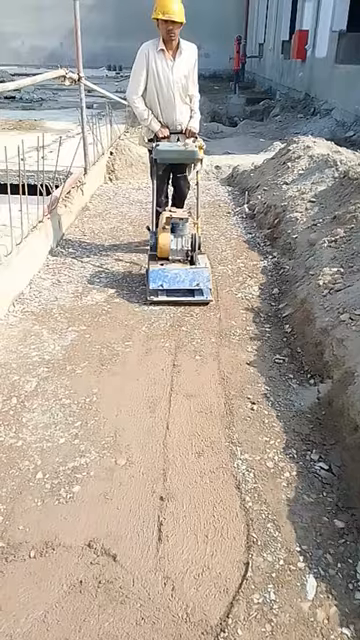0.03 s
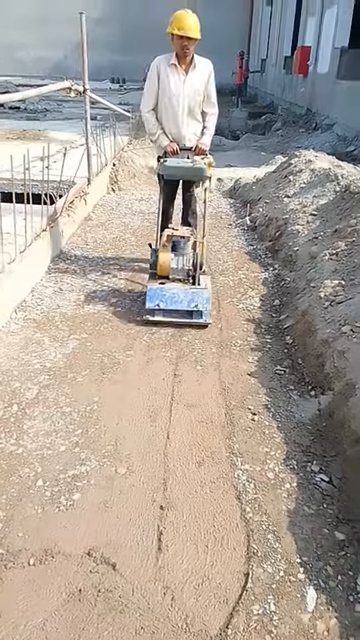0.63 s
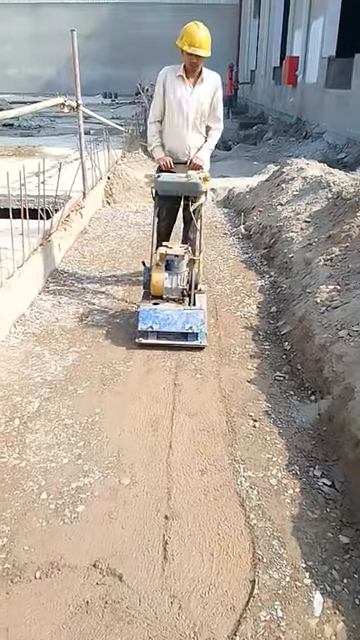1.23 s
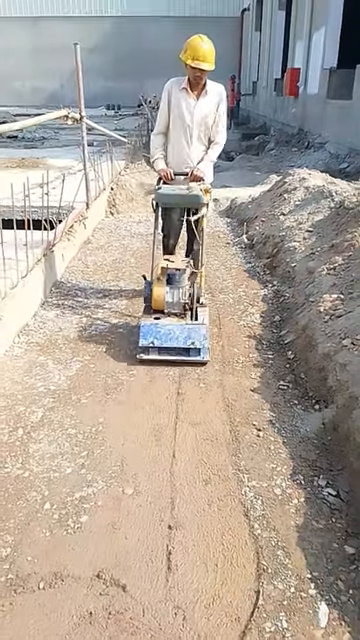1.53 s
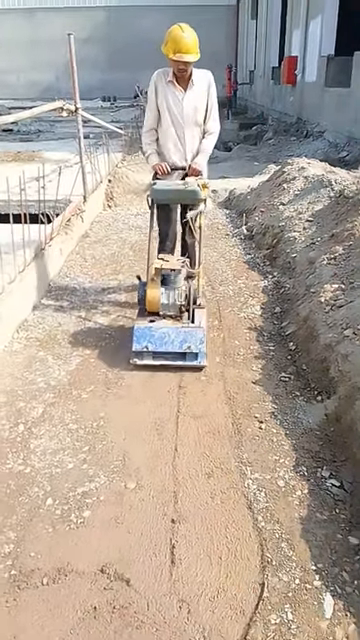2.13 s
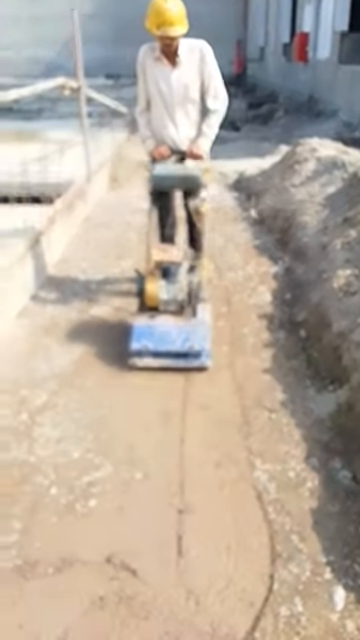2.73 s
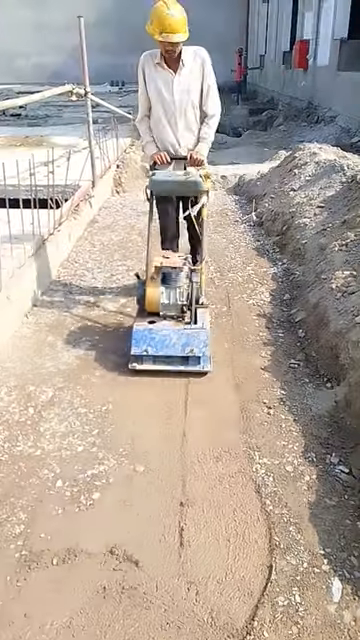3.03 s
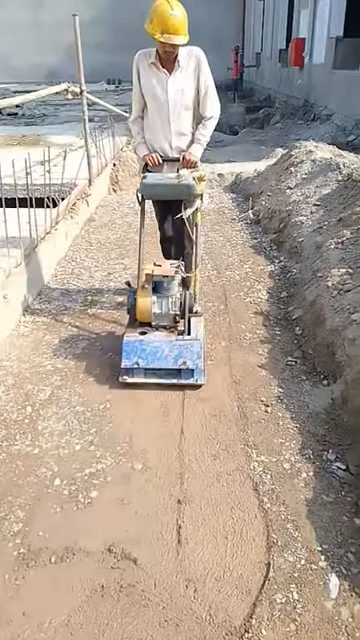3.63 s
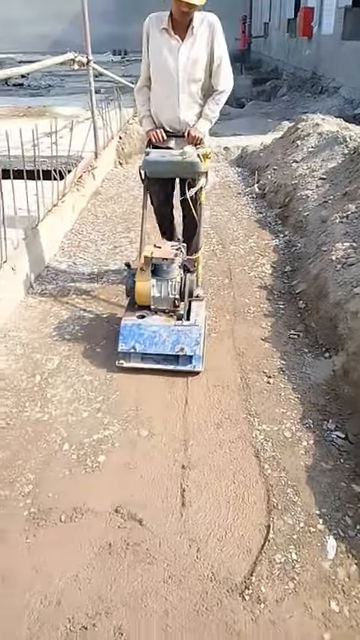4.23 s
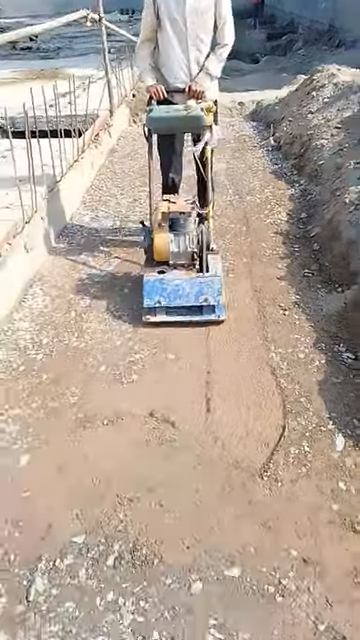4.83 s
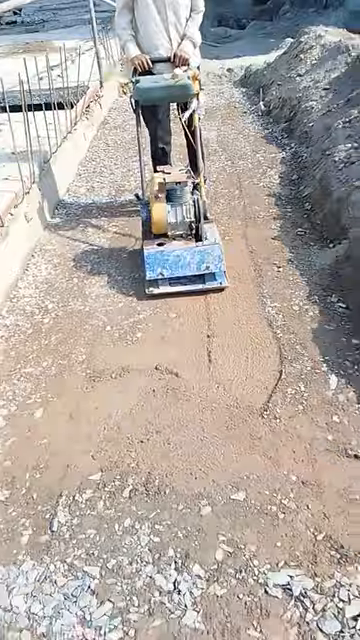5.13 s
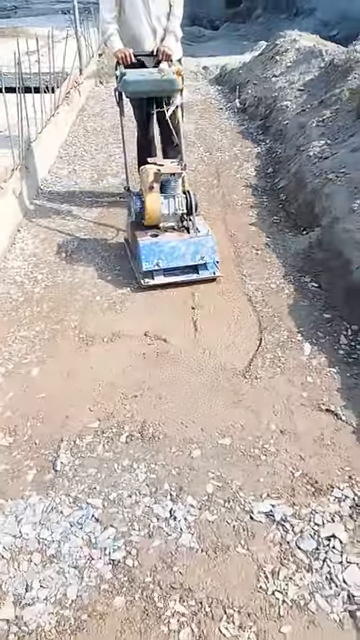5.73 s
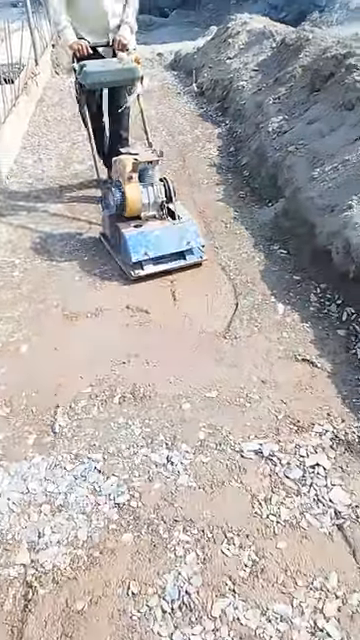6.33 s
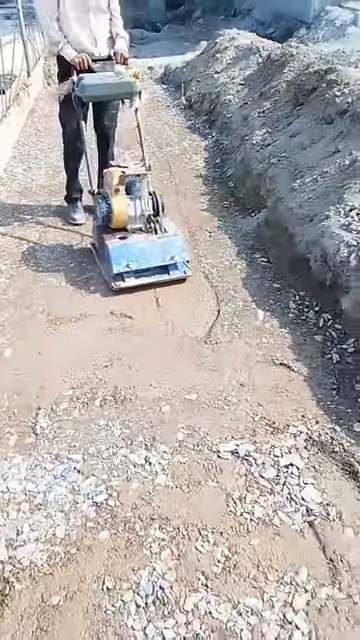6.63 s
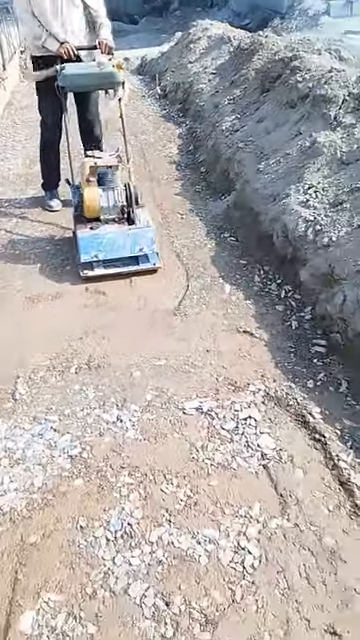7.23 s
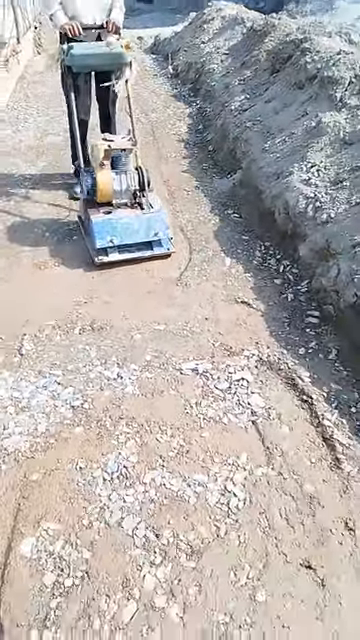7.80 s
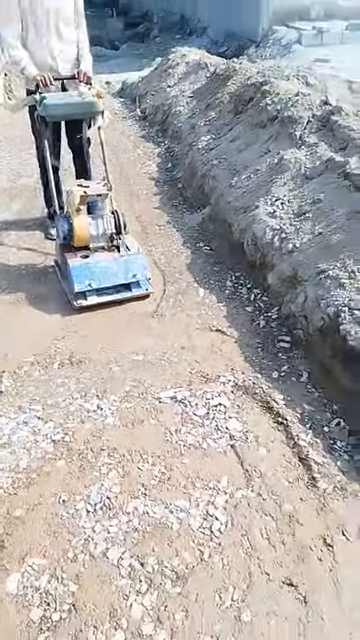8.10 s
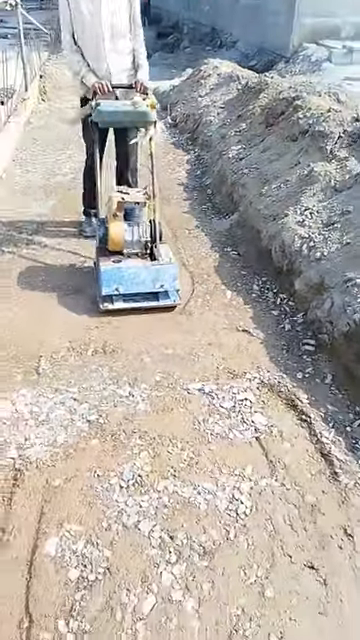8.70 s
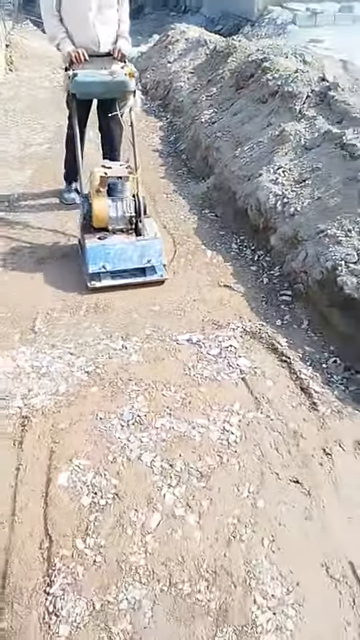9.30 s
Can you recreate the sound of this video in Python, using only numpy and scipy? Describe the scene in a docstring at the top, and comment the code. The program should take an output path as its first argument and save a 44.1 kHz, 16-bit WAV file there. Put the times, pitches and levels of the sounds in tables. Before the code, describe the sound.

A petrol plate compactor runs steadily over soil and gravel, with a loud metallic rattle and a droning engine.

```python
"""A petrol plate compactor in the open air, crawling over soil and gravel towards the microphone and turning.
Its eccentric shaft slaps the plate on the ground 70 times a second; a worn bearing knocks and sings
under the swinging load. Bands of the rattle shift and swell as the machine nears and turns.
Close up, one bearing tone briefly howls. The one-cylinder engine putters below; stones thump
under the plate, grit hisses and loose steel parts ring."""
import sys
import numpy as np
from scipy import signal
from scipy.fft import rfft, irfft, next_fast_len
from scipy.io import wavfile
from scipy.ndimage import uniform_filter1d, minimum_filter1d, map_coordinates

SR = 44100
rng = np.random.default_rng(int(sys.argv[2]) if len(sys.argv) > 2 else 0)


def master_out(mix):
    """Clip the mix to full scale and print it as 16-bit PCM to the path in sys.argv[1]."""
    frames = np.transpose(np.atleast_2d(mix))
    ceiling = np.clip(frames, -1, 1)
    pcm = np.round(ceiling * 32767).astype(np.int16)
    wavfile.write(sys.argv[1], SR, pcm)


N = 417186
KNOCKS_PER_TURN, FIRINGS_PER_TURN = 3.775, .3639  # bearing and engine, per turn of the shaft

# The eccentric shaft. Each row: time in seconds, speed in turns per second.
SHAFT_SPEED = [(0, 70.25), (.45, 69.96), (.75, 70.23), (1.4, 69.97), (1.95, 70.28), (2.42, 69.94),
               (2.92, 70.7), (3.5, 69.93), (4.2, 70.36), (4.65, 69.93), (5.05, 70.3), (5.7, 69.34),
               (6.3, 70.18), (6.9, 70.45), (7.35, 69.91), (7.7, 70.46), (8.3, 69.84), (8.8, 69.72),
               (9.35, 68.9)]
# The machine's path, seen from the microphone. Each row: time in seconds,
# nearness from 0 far to about 1 close, swing of its heading from about -1 to 1.
MACHINE_PATH = [(.1, 0.004, 0.023), (2.2, 0.18, -0.44), (4.0, 0.59, -1.39), (4.6, 0.59, -0.43),
                (5.1, 0.33, -0.12), (5.7, 0.76, 0.99), (6.2, 0.95, 0.37), (6.6, 1.09, -0.97),
                (7.95, 0.98, -0.86), (8.2, 1.17, 0.036), (8.6, 1.01, 1.2), (9.4, 1, 0.082)]
# The leading bearing tones. Each row: multiple of the knock rate, sideband in shaft orders,
# level in dB, gain in dB per unit of nearness, gain in dB per unit of swing.
LEAD_TONES = [(1, 2, -34.5, 5.5, -1.5), (2, 3, -26, -7.5, 2), (4, 3, -47, 15.5, -3.5)]
# The weaker bearing tones. Each row: multiple of the knock rate, sideband in shaft orders, level in dB.
WEAK_TONES = [(1, 1, -45), (1, 3, -37), (1, 4, -41), (1, 6, -32.5), (1, 7, -36.5), (1, 8, -40), (2, 2, -36),
              (2, 4, -28), (2, 5, -41), (2, 6, -42.5), (2, 7, -48), (3, 7, -41), (3, 2, -35.5),
              (3, 3, -32.5), (3, 4, -29.5), (3, 5, -41.5), (3, 6, -36), (4, 4, -38), (4, 5, -31.5),
              (4, 6, -36), (4, 7, -43), (5, 4, -39), (5, 6, -36.5), (5, 7, -49.5)]
# The shaft's hum. Each row: shaft order, level in dB.
SHAFT_HUM = [(1, -76), (2, -54.5), (3, -47), (4, -44), (5, -39.5), (6, -38.5), (7, -49)]
# The broad sound of the steel body. Each row: frequency in Hz, relative level in dB.
BODY_SPECTRUM = [(150, -44), (230, 0), (430, -2), (520, -24), (1000, -3.5), (1550, -0.5), (2000, -1.5),
                 (3000, 4), (3450, 2.5), (3800, 1), (4100, -10.5), (4500, -18), (5200, -23), (6200, -33),
                 (8000, -50)]
# Bands of the rattle that shift and swell as the machine nears and turns. Each row: centre and width in
# Hz, level in dB, shifts in Hz per unit of nearness and of swing, gains in dB per unit of the same two.
MOVING_BANDS = [(758, 237, -31.5, -88, 31, 6, 0.5), (901, 230, -22.5, 123, 82, -7, -3.5),
                (1223, 270, -30, 129, 67, 5, -1), (1920, 420, -27.5, 265, 3, -15, -10),
                (2227, 370, -28.5, 133, 74, 3.5, 1.5), (2700, 174, -26.5, 221, 17, -14.5, -7)]
# A loose panel clatters. Each row: middle and half length in seconds, pitch in Hz, level in dB.
PANEL_CLATTERS = [(4.502, 0.47, 2240, -22.5), (4.55, 1.05, 3100, -29.5), (5.747, 0.5, 1520, -26.5),
                  (4.4, .45, 870, -32), (4.6, 0.43, 1300, -27), (6.296, 0.28, 810, -23.5),
                  (6.5, 0.14, 1400, -23), (6.705, 0.32, 1270, -25), (7.705, 0.29, 1295, -23),
                  (8.996, 0.15, 1530, -26), (8.15, 0.18, 2580, -25.5), (8.537, 0.41, 774, -24),
                  (9.15, 0.41, 2660, -30.5), (9.228, 0.21, 830, -22.5), (.8, 0.89, 1230, -34),
                  (1.1, 0.55, 790, -29.5), (3.3, 1, 830, -28), (2.45, 0.23, 875, -28),
                  (2.9, 0.32, 1440, -37), (4.55, .25, 3290, -32), (5.398, 0.37, 860, -30.5),
                  (6.15, 0.41, 1050, -31), (7.5, 0.64, 1590, -33.5), (8.25, 0.35, 1970, -33)]
# Hard landings of the plate and clanks of the belt guard. Each row: start in seconds, level in dB.
PLATE_LANDINGS = [(.402, -10), (.66, -12), (.857, -13), (1.285, -13), (1.497, -12), (2.276, -13),
                  (2.326, -14), (2.368, -12), (2.44, -13), (2.515, -14), (2.572, -13.5), (2.639, -14),
                  (2.695, -12), (2.766, -14), (2.977, -14), (3.335, -11), (4.245, -13), (4.347, -13),
                  (4.548, -13), (4.674, -14), (4.747, -14), (4.932, -13), (5.186, -13), (5.259, -15),
                  (5.416, -13), (5.546, -14), (6.006, -14), (6.206, -12), (6.264, -14), (6.55, -12),
                  (7.045, -12), (7.189, -14), (7.573, -15), (8.258, -11), (8.571, -10), (9.002, -13),
                  (9.189, -13), (9.245, -13), (9.304, -13)]
BELT_GUARD_CLANKS = [(.228, -17), (.53, -20), (.742, -21), (.797, -19), (.853, -19.5), (1.229, -20),
                     (1.646, -20), (1.722, -21), (2.219, -21), (2.279, -18), (2.331, -20), (2.421, -20),
                     (2.817, -20), (2.929, -18), (3.073, -21), (3.36, -21), (3.814, -21), (4.175, -19),
                     (4.236, -22)]
# The modes these blows ring. Each row: frequency in Hz, relative level in dB.
PLATE_RING = [(770, -2), (850, -4), (950, -4.5), (1090, -2.5), (1280, -2), (1450, -5.5), (2250, -18),
              (3100, -10)]
BELT_GUARD_RING = [(2690, -3), (2780, 5), (2870, -7)]
# The colours of muffler, pounded soil and grit. Each row: frequency in Hz, relative level in dB.
MUFFLER_SPECTRUM = [(60, -52), (100, -24.5), (128, -15.5), (153, -27), (178, -20.5), (205, -4.5), (250, 3),
                    (305, -1), (380, -2.5), (530, -9.5), (575, -7), (700, -5), (950, -10.5), (2500, -31),
                    (6000, -64)]
SOIL_SPECTRUM = [(25, -55), (50, -45), (100, -14.5), (140, -22.5), (165, -31), (190, -18), (230, -1.5),
                 (350, 2), (450, -5.5), (600, -7), (1200, -31), (3000, -83)]
GRIT_SPECTRUM = [(3500, -11), (5000, -13), (6300, 1), (7800, 6), (9000, 4.5), (12000, 2), (14000, 3),
                 (15700, 6.5)]
# Stones under the plate. Each row: start in seconds, relative peak level in dB.
STONE_THUMPS = [(0.569, -14.5), (1.233, -16), (1.354, -19), (1.989, -11.5), (2.04, -21), (2.095, -18.5),
                (2.408, -15.5), (2.731, -12.5), (4.63, -17), (6.452, -14), (6.525, -18), (6.816, -12.5),
                (7.199, -14.5), (7.295, -9.5), (7.688, -11.5), (8.008, -15)]
# The pulley rings louder. Each row: middle and half length in seconds, level in dB.
PULLEY_SPELLS = [(1.68, 0.5, -33.5), (1.788, 0.038, -34), (2.37, 0.035, -33), (5.447, 0.16, -33.5),
                 (7.86, 0.066, -30.5), (9.4, 0.3, -31.5)]
# The belt guard rings on. Each row: middle and half length in seconds, pitch in Hz, level in dB.
BELT_GUARD_SPELLS = [(.5, 0.91, 2676, -32.5), (.7, 1, 2767, -29.5), (1.8, 0.28, 2760, -32),
                     (2.6, 0.76, 2775, -29.5), (3.1, 1, 2280, -30.5)]
# Loose bolts and brackets. Each row: pitch in Hz, usual level in dB.
LOOSE_PARTS = [(6934, -66), (7531, -71), (7973, -73), (10153, -69), (10794, -68.5), (11784, -67.5),
               (12279, -69), (13491, -68), (14530, -64), (15649, -54.5)]
# One part jingles out. Each row: middle and half length in seconds, pitch in Hz, level in dB.
JINGLE_SPELLS = [(1.5, .7, 7531, -53), (1.8, .8, 11784, -55), (3.3, .3, 14530, -50), (3.6, .5, 7531, -55),
                 (3.9, .5, 10794, -57), (4.4, .45, 6934, -56), (5.05, .15, 7531, -55),
                 (4.94, .06, 15649, -47), (5.26, .08, 15649, -46), (5.28, .06, 6934, -52),
                 (5.5, .15, 7531, -53), (5.7, .13, 6934, -52), (6.25, .07, 14530, -54),
                 (4.7, .25, 7531, -56), (5.6, .25, 7800, -58), (5.7, .2, 6550, -59), (6.4, .4, 7531, -63),
                 (7.1, .25, 14530, -50), (8.45, .12, 14530, -55), (7.55, .18, 10794, -58),
                 (7.7, .25, 14530, -54), (7.95, .18, 6934, -60), (8.3, .12, 10794, -58),
                 (9.3, .13, 6934, -53)]
# Bands that sink at the microphone. Each row: middle and half length in seconds,
# centre and width in Hz, gain in dB.
BAND_DIPS = [(.3, 1.2, 2150, 71, -5), (0.502, 0.33, 2970, 100, -5), (4.5, 3, 570, 25, -6),
             (8.903, 0.85, 612, 34.8, -11.5), (8.9, .5, 1780, 110, -7), (.1, .35, 500, 130, -6.5),
             (1.9, .7, 1540, 80, -4), (3.9, 0.63, 2150, 35, -10), (5.9, 0.43, 660, 30, -6),
             (7.15, 0.83, 1420, 50, -8.5), (7.3, .7, 2920, 100, -2), (8.75, .35, 2130, 60, -8),
             (9.45, .25, 580, 70, -15)]


def rattle(turns):
    """Rollers knock and the plate slaps under the load, about once a turn; steel scrapes throughout."""
    rollers = pulses(KNOCKS_PER_TURN * turns, jitter_s=.000097, scatter_db=5.5)
    ring = steel_clang(rollers * shaft_load(turns, depth_db=32))
    slap = rng.standard_normal(N) * shaft_load(turns, depth_db=28)
    lowpass = signal.butter(1, 1900, fs=SR, output="sos")
    knocks = unit(signal.sosfilt(lowpass, ring + .7 * slap) * amp(1.5 * wobble(45)))
    knocks = 4.5 * np.tanh(knocks / 4.5)  # the contacts give way, evening out the hardest blows
    scrape = unit(rng.standard_normal(N) * shaft_load(turns, depth_db=-4) * amp(1.02 * wobble(150)))
    bright_scrape = scrape - .52 * signal.sosfilt(lowpass, scrape)
    blows = amp(-10.5) * knocks + amp(-.9) * bright_scrape
    hz, t, spectra = signal.stft(blows * amp(.5 * wobble(25)), SR, nperseg=1024)
    return signal.istft(spectra * np.sqrt(rattle_power(hz, t)), SR, nperseg=1024)[1][:N]


def shaft_load(turns, depth_db):
    """The force of the eccentric weight peaks once a turn."""
    return unit(amp(depth_db * np.cos(2 * np.pi * turns) / 2))


def steel_clang(blows, t60=.012):
    """Every blow is followed by the short dense ring of welded steel."""
    t = np.arange(SR // 10) / SR
    tail = rng.standard_normal(len(t)) * amp(-60 * t / t60)
    return unit(blows + signal.fftconvolve(blows, tail / np.linalg.norm(tail))[:N])


def bearing_drone(turns):
    """The bearing's knock rate, swung by the load, sings in sidebands; the shaft hums beneath."""
    slip = .03 * wobble(14) + .007 * wobble(60)  # rollers creep in their cage
    mean_speed = turns[-1] * SR / N
    # neighbouring tones take the same path through the steel, so they crest together
    lags = .62 * rng.random(size=64)

    def tone(multiple, sideband):
        lag = lags[round(multiple * round(KNOCKS_PER_TURN) + sideband)]
        cycles = (multiple * KNOCKS_PER_TURN + sideband) * turns + multiple * slip + lag
        return np.sqrt(2) * np.sin(2 * np.pi * cycles)

    out = np.zeros(N)
    for multiple, sideband, db, near_db, swing_db in LEAD_TONES:
        level = amp(from_microphone(db, near_db, swing_db) + 1.8 * wobble(14) + 1.2 * wobble(3))
        if multiple == 2:  # this tone flutters, and howls near the end
            flutter = unit(amp(4 * np.tanh(wobble(45))))
            level = np.hypot(level * flutter, plate_howl())
        out += level * tone(multiple, sideband)
    closer_db = from_microphone(-4.5, per_nearness=2, per_swing=0)
    for multiple, sideband, db in WEAK_TONES:
        gain = band_gain((multiple * KNOCKS_PER_TURN + sideband) * mean_speed)
        out += amp(db + closer_db + 3.4 * wobble(9)) * gain * tone(multiple, sideband)
    for order, db in SHAFT_HUM:
        out += amp(db + .86 * wobble(3.8)) * np.sin(2 * np.pi * (order * turns + rng.random()))
    return out


def bearing_tone(turns, cycles_per_turn=8.55165):
    """A steady bearing tone near 600 Hz, heard over the engine's puffs."""
    return amp(-38 + wobble(2.7)) * np.sqrt(2) * np.sin(2 * np.pi * cycles_per_turn * turns)


def plate_howl(start_s=8.1, attack_s=.075, hold_s=.47, fade_db_per_s=22):
    """Envelope of a howl close to the microphone: the plate suddenly takes up one bearing tone."""
    age = np.maximum(np.arange(N) / SR - start_s, 0)
    fade_db = fade_db_per_s * np.maximum(age - hold_s, 0)
    return np.minimum(age / attack_s, 1) * amp(-20 - fade_db + 1.6 * wobble(22))


def hammering(turns, slap_db=1.1, chatter_db=.45, judder_db=.75):
    """Gain of the steel: it surges about once a turn, and more when a roller meets the peak load."""
    beat = KNOCKS_PER_TURN % 1  # the rollers beat against the nearest shaft orders below and above
    wave = lambda per_turn: np.cos(2 * np.pi * per_turn * turns)
    return unit(amp(slap_db * wave(.97) + chatter_db * wave(1 - beat) + judder_db * wave(beat)))


def rattle_power(hz, t):
    """Power of the body, the moving bands and the clatters at the microphone, by frequency and time."""
    share = lambda shape: shape / shape.mean(axis=0)
    peak = lambda centre_hz, width_hz: share((1 + ((hz[:, None] - centre_hz) / width_hz) ** 2) ** -4.)
    power = share(spectrum_gain(BODY_SPECTRUM, hz)[:, None] ** 2) * amp(-24.5) ** 2
    for rest_hz, width_hz, db, near_hz, swing_hz, near_db, swing_db in MOVING_BANDS:
        level = amp(from_microphone(db, near_db, swing_db, t))
        centre_hz = from_microphone(rest_hz, near_hz, swing_hz, t)
        power = power + peak(centre_hz, width_hz) * level ** 2
    for middle_s, half_s, centre_hz, db in PANEL_CLATTERS:
        level = amp(db) * swell(middle_s, half_s, t)
        power = power + peak(centre_hz, width_hz=105) * level ** 2
    return power


def band_gain(tone_hz):
    """A tone swells as a band of the rattle moves onto it."""
    hz, t = np.linspace(0, SR / 2, 1024), np.linspace(0, N / SR, 200)
    power = rattle_power(hz, t)[np.searchsorted(hz, tone_hz)]
    return unit(curves(np.c_[t, np.sqrt(power)])[0])


def strikes(blows, modes, t60, attack_s=.0009):
    """Struck steel: each blow rings the same modes, in a slightly different mix."""
    t = np.arange(SR // 10) / SR
    envelope = amp(-60 * t / t60) * (1 - np.exp(-t / attack_s))
    hz, mode_db = np.transpose(modes)
    out = np.zeros(N + len(t))
    for start_s, db in blows:
        sizes = amp(db + mode_db + rng.normal(0, 2.3, len(hz)))
        waves = np.sin(2 * np.pi * (hz[:, None] * t + rng.random((len(hz), 1))))
        out[round(start_s * SR):][:len(t)] += sizes @ waves * envelope
    return out[:N]


def engine(turns):
    """Belted to the shaft, the engine puffs through its muffler at each firing."""
    puffs = pulses(FIRINGS_PER_TURN * turns, jitter_s=.00009, scatter_db=1.3)
    return amp(-31.7) * coloured(muffler_chambers(puffs), MUFFLER_SPECTRUM)


def muffler_chambers(puffs):
    """Echoes in the muffler's chambers spread every puff in the same way."""
    def allpass(hz):
        echoes = [np.exp(-2j * np.pi * hz * delay_s) for delay_s in (.0023, .0041, .0067)]
        return np.prod([(echo - .5) / (1 - .5 * echo) for echo in echoes], axis=0)
    return filtered(puffs, allpass)


def soil_pounding(turns, steady_db=-35.5, rise_s=.02):
    """The plate pounds the ground and bucks on stones."""
    bucking = np.zeros(N)
    for start_s, db in STONE_THUMPS:
        age = np.maximum(np.arange(N) / SR - start_s, 0) / rise_s
        bucking += amp(db - 9) * age * np.exp(1 - age)
    pounding = coloured(rng.standard_normal(N) * shaft_load(turns, depth_db=6.5), SOIL_SPECTRUM)
    return np.hypot(amp(steady_db), bucking) * pounding


def grit_bursts(per_second=150, decay_s=.007):
    """Envelope of grit being crushed: small bursts that start sharply and die away."""
    crushes = (rng.random(N) < per_second / SR) * amp(3.3 * np.clip(rng.standard_normal(N), -2, 2))
    return unit(signal.lfilter([1], [1, -np.exp(-1 / (decay_s * SR))], crushes))


def grit_hiss(bursts, level_db, even_share):
    """Grit grinds under the plate, single bursts over an even hiss."""
    grains = rng.standard_normal(N) * (even_share + bursts) * amp(.25 * wobble(390) + .67 * wobble(24))
    return amp(level_db) * coloured(grains, GRIT_SPECTRUM)


def pulley_ring():
    """The shaken pulley holds one clear note that swells now and then."""
    swells = sum(amp(db) * swell(middle_s, half_s) for middle_s, half_s, db in PULLEY_SPELLS)
    return (amp(-35.5) + swells) * steel_mode(hz=3429, t60=.09, shaking=amp(1.5 * wobble(70)))


def guard_ring():
    """The loose belt guard rings in fits while the machine is still some way off."""
    out = np.zeros(N)
    for middle_s, half_s, hz, db in BELT_GUARD_SPELLS:
        fits = amp(4 * np.tanh(wobble(40)))
        out += amp(db) * swell(middle_s, half_s) * steel_mode(hz, t60=.071, shaking=fits)
    return out


def bolt_jingle(bursts, grit_db):
    """Bolts and brackets jingle faintly with each crush of grit, harder where the grit is loud."""
    out = np.zeros(N)
    shaken_db = .5 * (grit_db - grit_db.mean())
    for hz, db in LOOSE_PARTS:
        # each part works loose, chatters for a moment and settles again
        chatter = (1 + bursts) * amp(3 * wobble(22) + 6.5 * np.tanh(1.5 * wobble(7) - .6))
        out += amp(db + shaken_db) * steel_mode(hz, t60=.07, shaking=chatter)
    for middle_s, half_s, hz, db in JINGLE_SPELLS:
        chatter = (1 + bursts) * amp(3 * wobble(16))
        out += amp(db) * swell(middle_s, half_s) * steel_mode(hz, t60=.074, shaking=chatter)
    return out


def steel_mode(hz, t60, shaking, skirt_hz=500):
    """A steel mode shaken by noise with the given envelope; a second, wide pole keeps its skirts dark."""
    decay_rates = np.array([np.log(1000) / t60, 2 * np.pi * skirt_hz])
    poles = np.exp((2j * np.pi * hz - decay_rates) / SR)
    return unit(signal.lfilter([1], np.poly(poles), rng.standard_normal(N) * shaking).real)


def band_dips(x):
    """At the microphone, narrow bands sink for a while as the machine moves."""
    hz, t, spectra = signal.stft(x, SR, nperseg=2048)
    dip_db = sum(db * np.exp(-((hz[:, None] - centre_hz) / width_hz) ** 2) * swell(middle_s, half_s, t)
                 for middle_s, half_s, centre_hz, width_hz, db in BAND_DIPS)
    return signal.istft(spectra * amp(dip_db), SR, nperseg=2048)[1][:N]


def from_microphone(base, per_nearness, per_swing, times=None):
    """A quantity that follows how close the machine is and which side it turns to the microphone."""
    nearness, swing = curves(MACHINE_PATH, times)
    return base + per_nearness * nearness + per_swing * swing


def pulses(cycles, jitter_s, scatter_db):
    """One impulse for each whole cycle, uneven in time and size."""
    onsets = np.flatnonzero(np.diff(np.floor(cycles)))
    timing, size = rng.standard_normal((len(onsets), 2)).T
    when = np.clip(np.round(onsets + jitter_s * SR * timing), 0, N - 1).astype(int)
    return np.bincount(when, amp(scatter_db * size), N)


def swell(middle_s, half_s, times=None):
    """A smooth rise and fall, per sample or at the given times."""
    t = np.arange(N) / SR if times is None else times
    return np.exp(-((t - middle_s) / half_s) ** 2)


def curves(rows, times=None):
    """Each column after the time, per sample or at the given times."""
    knots_s, *columns = np.transpose(rows)
    t = np.arange(N) / SR if times is None else times
    return [np.interp(t, knots_s, column) for column in columns]


def wobble(rate):
    """A smooth random curve, rate knots a second."""
    knots = rng.standard_normal(int(N * rate / SR) + 4)
    grid = np.linspace(0, N, N // 16)
    return np.interp(np.arange(N), grid, map_coordinates(knots, [grid * rate / SR]))


def coloured(x, spectrum):
    """x through a spectrum, at rms 1."""
    return unit(filtered(x, lambda hz: spectrum_gain(spectrum, hz)))


def spectrum_gain(spectrum, hz):
    """Gain between (Hz, dB) points on a log frequency axis."""
    knots_hz, db = np.transpose(spectrum)
    return amp(np.interp(np.log(hz + 1), np.log(knots_hz + 1), db))


def filtered(x, response):
    """x through a response given as a function of Hz."""
    size = next_fast_len(N + SR // 4)
    return irfft(rfft(x, size) * response(np.fft.rfftfreq(size, 1 / SR)), size)[..., :N]


def amp(db):
    return 10 ** (np.asarray(db) / 20)


def unit(x):
    return x / np.sqrt(np.mean(x ** 2) + 1e-20)


def scene():
    """The compactor approaches one microphone in the open air; its shaft sets the pace."""
    turns = np.cumsum(curves(SHAFT_SPEED)[0]) / SR
    bursts = grit_bursts()
    grit_db, even_share = curves([(4.22, -43, .8), (4.69, -56, .7)])  # midway the grit thins to a trace
    steel = (rattle(turns) + bearing_drone(turns)) * hammering(turns)
    landings = strikes(PLATE_LANDINGS, PLATE_RING, t60=.022)
    clanks = strikes(BELT_GUARD_CLANKS, BELT_GUARD_RING, t60=.045)
    machine = steel + landings + clanks + engine(turns) + bearing_tone(turns)
    ground = soil_pounding(turns) + grit_hiss(bursts, grit_db, even_share)
    fittings = pulley_ring() + guard_ring() + bolt_jingle(bursts, grit_db)
    return band_dips(machine + ground + fittings)[None]


def record(dry):
    """The microphone opens after a moment; a limiter holds the peaks and the top treble is cut off."""
    open_s, ceiling, top_hz = .083, .68, 15800
    live = dry * (np.arange(N) / SR > open_s)
    needed_gain = np.minimum(1, ceiling / (np.abs(live) + 1e-9))
    smooth_gain = uniform_filter1d(minimum_filter1d(needed_gain, size=241), size=241)
    return filtered(live * smooth_gain, lambda hz: hz < top_hz)


dry = scene()
out = record(dry)
master_out(out)
```